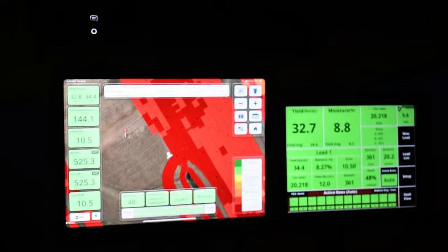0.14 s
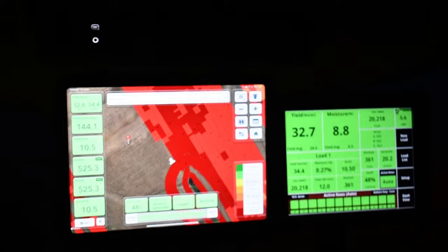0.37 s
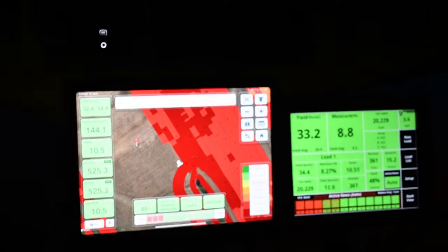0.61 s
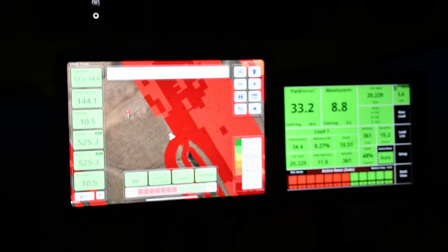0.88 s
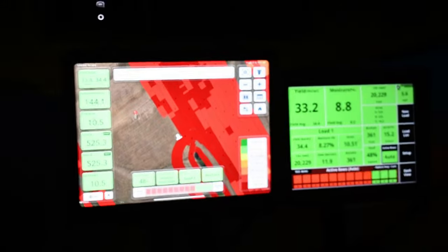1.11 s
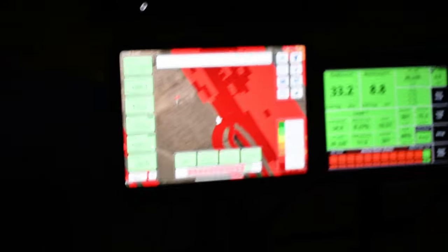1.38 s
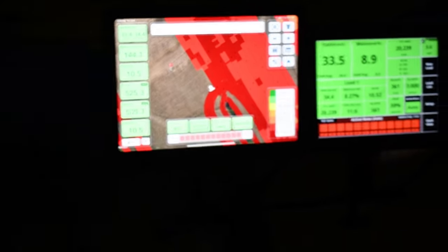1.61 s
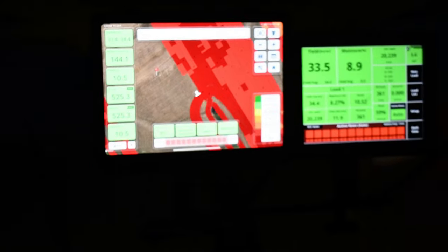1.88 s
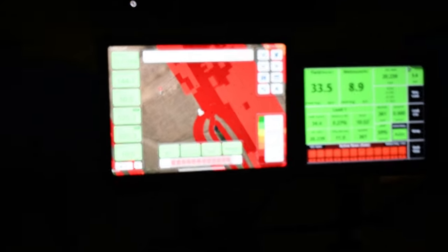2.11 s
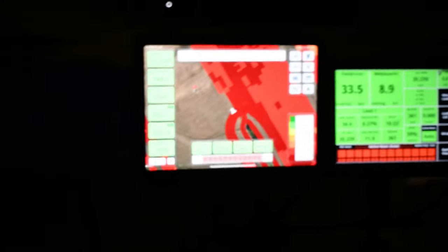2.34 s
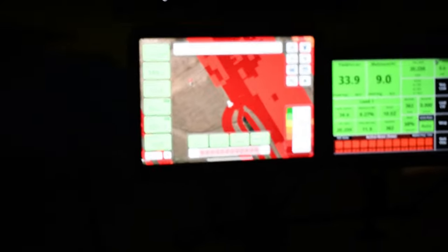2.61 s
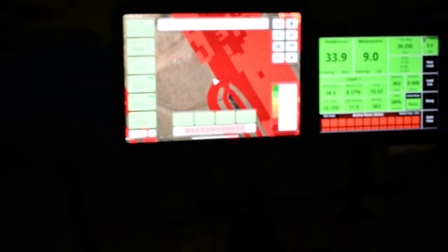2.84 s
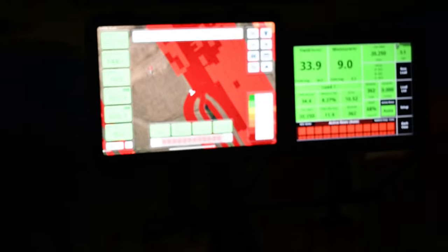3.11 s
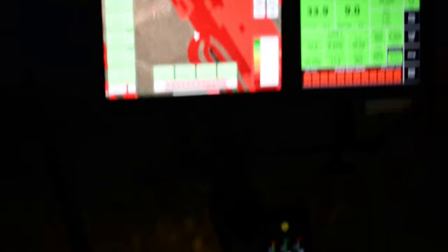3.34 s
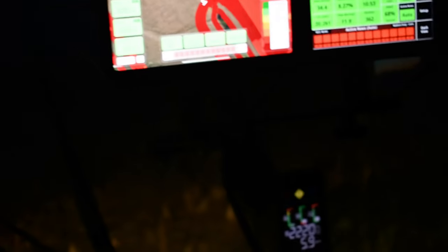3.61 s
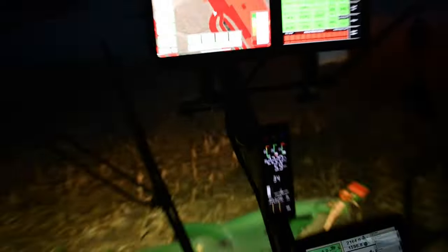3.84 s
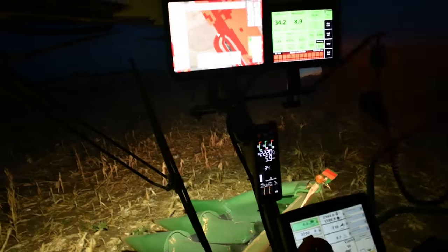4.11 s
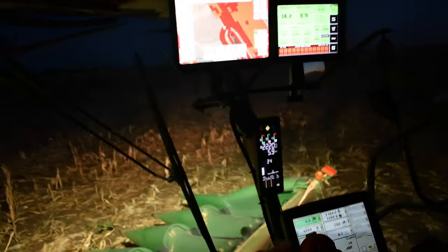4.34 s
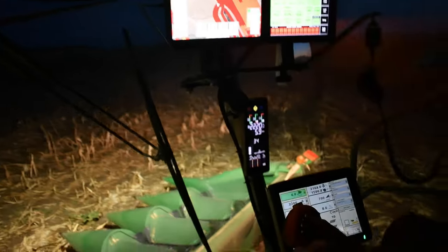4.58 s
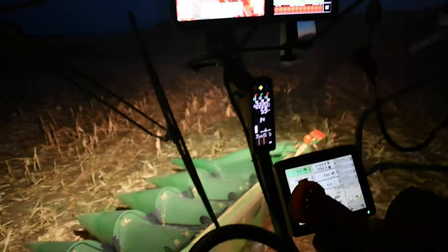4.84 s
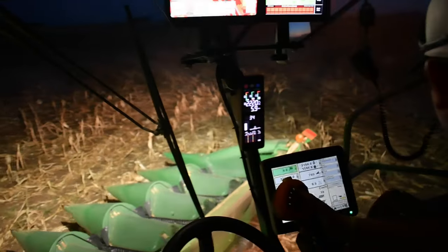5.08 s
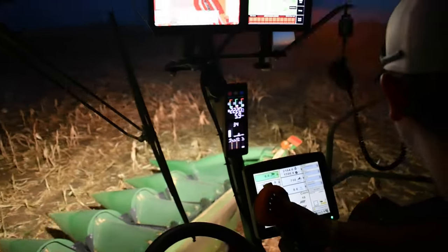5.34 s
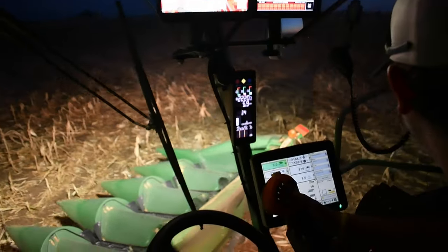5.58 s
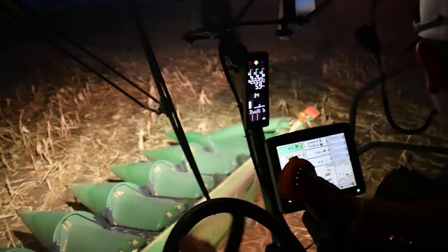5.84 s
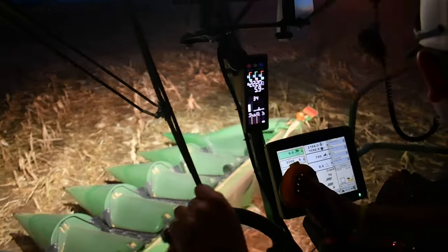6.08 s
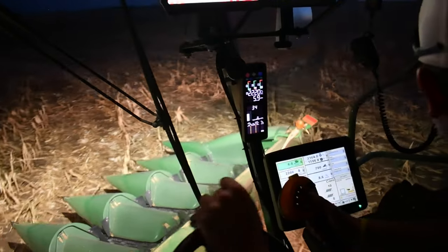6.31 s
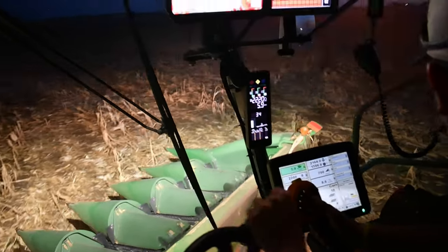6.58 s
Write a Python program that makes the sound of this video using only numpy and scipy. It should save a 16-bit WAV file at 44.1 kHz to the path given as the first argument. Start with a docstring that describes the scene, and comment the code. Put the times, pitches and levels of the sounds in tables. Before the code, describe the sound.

From 0 to about 6.7 seconds, a combine harvester runs without pause, heard by one microphone inside its closed cab. The sound begins at full strength, slightly louder for the first half second, then stays nearly level. A deep, boxy, noisy drone dominates, lurching gently several times a second as crop passes the drum. Panels boom and buzz unevenly. Low gear hums throb and drift, one around 250 hertz and another near 128. A thin pump whine near 700 hertz stays almost constant, clearer around 0.7, 2.4 and 5 seconds. Quiet, dense grain rattle, muffled crop rush and faint hiss lie above. Tiny high squeaks chirp at roughly 3.5, 3.6 and 4 seconds, almost buried. Higher gear tones come forward slightly around 6 seconds. The machine is still running steadily when the sound ends.

```python
"""Combine harvester cab

Engine, drum and header shake a closed cab, whose air and panels boom as noise shaped by many resonances.
Gears hum as sines of wandering pitch and throbbing level; a hydraulic pump whines as a sine and its octave.
Grain rattles as random impulses through a sheet's response; rushing air and hiss are coloured noise.
A dry joint squeaks in a few short whistles of arching pitch."""
import sys
import numpy as np
from scipy import signal
from scipy.fft import rfft, irfft, next_fast_len
from scipy.io import wavfile
from scipy.ndimage import uniform_filter1d, map_coordinates

SR = 44100
rng = np.random.default_rng(int(sys.argv[2]) if len(sys.argv) > 2 else 0)


def inscribe(sig):
    """Save sig as 16-bit PCM at rate SR to the path in sys.argv[1].

    A 1-D sig is mono; a 2-D sig holds one channel per row.
    Samples are clipped to [-1, 1] before scaling.
    """
    pcm = np.round(np.clip(np.atleast_2d(sig).T, -1, 1) * 32767)
    wavfile.write(sys.argv[1], SR, pcm.astype(np.int16))


def undo_db(level):
    """Turn decibels back into plain size, where 20 dB means ten times bigger."""
    steps = np.asarray(level, float) / 20
    return 10 ** steps


N = 295470  # samples

# Machine load: t/s, level/dB about the usual one
LOAD = [(0, 1.5), (.4, 0), (.9, -0.84), (2.2, -0.3), (3.2, -.5), (4, 0), (4.7, -.5), (5.3, -0.6), (6, 0),
        (6.7, -0.1)]
# Resonances of cab air and panels: f/Hz, width/Hz, relative level/dB
CAB_RESONANCES = [(97, 12, -9), (128, 16, -6.5), (164.6, 4.9, -8.5), (194, 14, -6), (220, 20, -11.5),
                  (242, 16, -7.5), (265.5, 3.2, -6), (330, 14, -14), (351, 16, -12), (398.4, 32, -17.5),
                  (418, 7.1, -14.5), (510, 11, -18), (561.5, 17, -20.5), (667, 33, -23.5), (806, 24, -22),
                  (849, 17, -25), (923, 12, -20), (1140, 31, -29.5)]
# Dull rumble that fills the gaps between the resonances: f/Hz, relative level/dB per Hz
CAB_RUMBLE = [(20, -61), (35, -43), (60, -23.5), (85, -22), (120, -9), (250, -15), (380, -21.5),
              (600, -22.5), (760, -33.5), (1100, -39), (1500, -48.5), (2500, -120)]

# Panels that the crop flow shakes now harder, now less: f/Hz, width/Hz, then rows of t/s, level/dB
ROOF = 655, 22, [(0, -63.5), (1.4, -59), (1.9, -49), (2.5, -47.5), (3.1, -53), (3.4, -54), (3.7, -51),
        (4.2, -62), (4.7, -49), (5.2, -48), (5.6, -49), (6.1, -49), (6.3, -55), (6.7, -56)]
DOOR = 531, 20, [(0, -47), (.7, -45), (1.3, -44.5), (1.8, -48.5), (3, -47.5), (4.2, -45), (5.1, -45.5),
        (5.8, -44), (6.7, -44)]
WINDSCREEN = 290, 40, [(0, -40), (.75, -38.5), (1.3, -42), (1.7, -36), (3.15, -36), (4, -39.5), (4.9, -42),
              (5.3, -39.5), (6.7, -45)]
REAR_WALL = 224, 20, [(0, -38), (.8, -37.5), (1.5, -34.5), (2.6, -40), (3.3, -39.5), (3.7, -34),
             (4.7, -33.5), (5.3, -35), (6.1, -34), (6.5, -35.5), (6.7, -36)]
FLOOR = 154, 14, [(0, -34), (.3, -28.5), (.6, -39), (1.5, -36.5), (2.5, -36), (3.7, -35.5), (4.3, -36),
         (4.7, -39), (4.95, -35), (5.3, -39.5), (5.9, -38), (6.7, -39)]
SIDE_PANE = 955, 14, [(0, -60), (1.5, -55.5), (2.5, -53), (3.4, -51), (4.5, -54), (5.5, -54.5), (6.7, -54)]

# Strongest hum of the threshing gear: t/s, f/Hz, level/dB, throb/dB
THRESHING_HUM = [(0, 252.3, -34.5, 2), (.8, 256.7, -31.5, 3.5), (.95, 254.9, -41, 3),
                 (1.45, 247.3, -34.5, 2.5), (1.75, 248, -32.5, 2.5), (2.05, 248.3, -36.5, 3),
                 (2.38, 247.3, -31, 2), (2.62, 250, -39, 3), (2.82, 257.8, -31, 1.5),
                 (3.4, 251.7, -31.5, 2.5), (3.58, 252.7, -38.5, 3.5), (3.75, 250.4, -30.5, 2),
                 (4.3, 250.6, -30, 2.5), (4.85, 251.4, -35.5, 2), (5.1, 246.5, -28, 2.5),
                 (5.6, 249.5, -33.5, 0.5), (6.2, 244.4, -31, 2.5), (6.4, 242, -39, 2.5),
                 (6.7, 245.4, -34, 5)]
# Low shaft hum: t/s, f/Hz, level/dB, throb/dB
SHAFT_HUM = [(0, 131.7, -39.5, 4), (.35, 130.9, -34, 3.5), (.7, 129.2, -32.5, 3), (1.2, 128, -33.5, 4),
             (1.452, 125.7, -42, 4), (1.8, 129, -31.5, 4.5), (2.4, 129.8, -39, 3), (3.1, 127, -37, 3),
             (3.7, 126, -34.5, 2.5), (4.3, 127.6, -39.5, 3), (5.2, 126.6, -39.5, 3.5), (5.55, 129, -42, 3),
             (6.1, 125.5, -39.5, 2), (6.5, 128.3, -39, 0), (6.7, 126.3, -29, 4.5)]
# Three higher gear hums that swell and sink: t/s, f/Hz, level/dB, throb/dB (sign ignored)
LOWER_MESH = [(0, 330, -44, 4), (.6, 328, -51, 4), (1.2, 328, -43, 3.2), (2.049, 324, -37.5, 4),
              (2.6, 328, -46.5, 4), (3.2, 328, -45, 4.4), (3.8, 328, -55.5, 2.9), (6.7, 328, -51, 3.5)]
MIDDLE_MESH = [(0, 479, -44, 2), (.5, 478, -44, 2), (1.3, 479, -45.5, 2), (1.8, 480, -43, 2.5),
               (2.1, 481, -53.5, 4), (2.6, 481, -48.5, 2), (3.4, 479, -46, 2.5), (3.9, 480, -53.5, 2),
               (4.3, 480, -47, -0.5), (4.7, 480, -53.5, 2.5), (5.3, 479, -48, 3.5), (6, 478, -53, 4),
               (6.7, 480, -43, 2)]
UPPER_MESH = [(0, 560.3, -61, 4), (3, 554.3, -56.5, 4), (3.6, 564.6, -50, 4), (4.4, 560.5, -52, 4.1),
              (5.001, 564.5, -51, 4.4), (5.6, 558.7, -50, 5.2), (6.05, 565.5, -41.5, 4.7),
              (6.35, 565, -51, 3.3), (6.7, 564, -41, 4.4)]
# Weak gear and shaft tones: f/Hz at the usual engine speed, wander/Hz, level/dB
WEAK_GEARS = [(38.4, .2, -66.5), (49.4, .4, -59.5), (103, 1.5, -51), (118.4, 0.58, -45), (159, 0.61, -43.5),
              (165.6, 0.67, -46), (192.2, 1.5, -49.5), (229, 1.5, -43), (263.3, .8, -42.5),
              (299, 0.73, -54), (493.3, 1, -53.5)]

# Pump whine, whose pitch also gives the engine speed: t/s, f/Hz, level/dB
WHINE = [(0, 699.5, -43.5), (.35, 704, -44.5), (.71, 702.5, -39), (.9, 702.6, -44.5), (1.12, 705, -42),
         (1.4, 702, -42.5), (1.68, 703.6, -46), (1.78, 702, -47), (1.95, 704, -50), (2.2, 704, -44.5),
         (2.3, 704.6, -44.5), (2.36, 704, -39), (2.48, 703, -42.5), (2.55, 707.4, -46.5),
         (2.75, 707.4, -47.5), (2.9, 709, -46), (3.2, 708, -44), (3.62, 704.2, -45.5), (3.87, 703.1, -54),
         (4.05, 699.5, -45.5), (4.25, 704, -44.5), (4.48, 704.4, -50), (4.62, 704.6, -43.5),
         (4.94, 707, -39.5), (5.3, 705.5, -39.5), (5.55, 704.6, -42.5), (5.75, 700.5, -47.5),
         (6.1, 703, -42.5), (6.3, 701.5, -47.5), (6.6, 701, -44.5), (6.7, 706, -45)]
# What the struck sheet passes through the glass: f/Hz, relative level/dB per Hz
SHEET = [(600, -120), (900, -3.5), (1300, 2.5), (2000, -3), (2600, -9), (4500, -23), (7000, -120)]
# Squeaks: start t/s, length/s, pitch crest after/s, crest f/Hz, level/dB before the fade
SQUEAKS = [(3.45, .06, 0.016, 6420, -70), (3.498, 0.036, 0.016, 6180, -73),
           (3.616, 0.026, 0.025, 5660, -67), (3.632, .03, .015, 5720, -77), (3.962, 0.069, .022, 6457, -66)]
# Crop and air heard through the glass: f/Hz, relative level/dB per Hz
RUSH = [(300, -120), (500, -30.5), (700, -9.5), (980, -7), (1420, -16.5), (1540, -20.5), (2020, -17.5),
        (2500, -24), (3050, -28), (3250, -31.5), (4000, -35), (4650, -34.5), (5100, -45.5), (7500, -120)]
# Ventilation and microphone hiss: f/Hz, relative level/dB per Hz
HISS = [(2500, -120), (4000, -34.5), (5000, 0.5), (6000, -3.5), (8000, -8.5), (9000, -9.5), (9600, -14.5),
        (12000, -18), (14500, -25), (15700, -28), (17000, -120)]

DRONE_DB, RATTLE_DB, RUSH_DB, HISS_DB = -29.5, -56.5, -43, -73  # usual levels
SURGE_DB, SURGES_PER_S = 0.8, 8  # the drone lurches as wads of crop pass the drum
HUM_THROBS_PER_S = 20
HUM_WANDER_HZ_PER_DB = 1.37  # the harder a hum throbs, the more its pitch strays
USUAL_WHINE_HZ, WHINE_FLICKER_DB = 704.5, 1.3
RATTLES_PER_S, RATTLE_SPREAD_DB = 600, 2  # grain and chaff striking sheet metal
SQUEAK_BEND_HZ_PER_S2, SQUEAK_ROUGH_HZ = 83000, 30
SQUEAK_EDGE_S, SQUEAK_FADE_DB_PER_S, SQUEAK_CHATTER_DB = 0.012, 82, 2.2
RUSH_FOLLOWS, HISS_FOLLOWS = 0.78, 0.6  # dB per dB of load
HISS_RISE_DB_PER_S = 0.39  # the hiss grows slowly


def unit(x):
    """Normalization: scales a signal to rms 1."""
    return x / np.sqrt(np.mean(x ** 2) + 1e-20)


def along(points, hz):
    """Frequency response: (Hz, dB) points joined on a log axis, as gain."""
    f, level = np.transpose(points)
    return undo_db(np.interp(np.log(hz + 1), np.log(f + 1), level))


def curves(rows):
    """Linear interpolation: one value per sample for each column after the time."""
    times, *columns = np.transpose(rows)
    return [np.interp(np.arange(N) / SR, times, column) for column in columns]


def wobble(rate):
    """Band-limited fluctuation: a smooth curve through random knots, rate of them a second."""
    knots = rng.standard_normal(int(N * rate / SR) + 4)
    return map_coordinates(knots, [np.arange(N) * rate / SR])


def patches(shape, bins, frames):
    """Local averaging: a random field of rms 1, smoothed over bins and frames."""
    across_bins = uniform_filter1d(rng.standard_normal(shape), size=bins, axis=0)
    return unit(uniform_filter1d(across_bins, size=frames, axis=1))


def noise(gain, patchy_db):
    """Linear filtering: noise with patches of random level, coloured by gain(Hz), at rms 1."""
    spectrum = signal.stft(rng.standard_normal(N), nperseg=512)[2]
    patchy = spectrum * undo_db(patchy_db * patches(spectrum.shape, bins=5, frames=12))
    x = signal.istft(patchy, nperseg=512)[1][:N]
    size = next_fast_len(N + SR)
    coloured = rfft(x, size) * gain(np.fft.rfftfreq(size, 1 / SR))
    return unit(irfft(coloured, size)[:N])


def tone(hz, db):
    """Phase is the integral of frequency: a sine of given rms level on a moving pitch."""
    cycles = np.cumsum(hz) / SR + rng.random()
    return np.sqrt(2) * undo_db(db) * np.sin(2 * np.pi * cycles)


def drone(level_db):
    """Forced resonance: random shaking feeds every cab mode; their powers add over a duller rumble."""
    def cab(hz):
        power = along(CAB_RUMBLE, hz) ** 2
        for centre, width, db in CAB_RESONANCES:
            power = power + undo_db(db) ** 2 / (1 + (2 * (hz - centre) / width) ** 2) ** 1.55
        return np.sqrt(power)
    return undo_db(level_db) * noise(cab, patchy_db=-0.44)


def panels():
    """Narrow-band noise: each panel rings as two randomly modulated carriers in quadrature."""
    turn = 2 * np.pi * np.arange(N) / SR
    out = np.zeros(N)
    for hz, width, rows in (ROOF, DOOR, WINDSCREEN, REAR_WALL, FLOOR, SIDE_PANE):
        ringing = wobble(width) * np.cos(turn * hz) + wobble(width) * np.sin(turn * hz)
        level_db, = curves(rows)
        out += undo_db(level_db) * unit(ringing)
    return out


def hum(rows):
    """Amplitude and frequency modulation: a gear tone throbs as the teeth load and unload."""
    hz, db, throb_db = curves(rows)
    throb_db = np.abs(throb_db)
    pitch = hz + HUM_WANDER_HZ_PER_DB * throb_db * wobble(10)
    throb = np.clip(wobble(HUM_THROBS_PER_S), -3, 1.2)  # dips go deeper than swells
    return tone(pitch, db + throb_db * throb)


def gears():
    """Superposition: five strong hums, and weaker tones whose pitch follows the engine speed."""
    speed = curves(WHINE)[0] / USUAL_WHINE_HZ
    out = sum(hum(rows) for rows in (THRESHING_HUM, SHAFT_HUM, LOWER_MESH, MIDDLE_MESH, UPPER_MESH))
    for hz, wander_hz, db in WEAK_GEARS:
        out += tone(hz * speed + wander_hz * wobble(6), db + 3.4 * wobble(7))
    return out


def pump():
    """Periodic pulsation: a nearly clean piston tone with a weak octave."""
    hz, db = curves(WHINE)
    whine = tone(hz + 1.6 * wobble(25), db + WHINE_FLICKER_DB * wobble(20))
    octave = tone(2 * hz + 3 * wobble(12), db - 21.5)
    return whine + octave


def rattle(level_db):
    """Impulse excitation: dense uneven ticks, whose clumps ring now duller, now brighter parts of the sheet."""
    struck = rng.random(N) < RATTLES_PER_S / SR
    ticks = struck * rng.standard_normal(N) * undo_db(RATTLE_SPREAD_DB * rng.standard_normal(N))
    hz, _, spectrum = signal.stft(ticks, SR, nperseg=512)
    clumps = undo_db(4.6 * patches(spectrum.shape, bins=3, frames=4))
    ringing = signal.istft(spectrum * along(SHEET, hz)[:, None] * clumps, nperseg=512)[1][:N]
    return undo_db(level_db) * unit(ringing)


def squeaks():
    """Stick-slip friction: fading whistles whose pitch arches as the dry joint speeds up and slows."""
    out = np.zeros(N)
    for start, length, crest, hz, db in SQUEAKS:
        t = np.clip(np.arange(N) / SR - start, 0, length)
        gate = np.clip(np.minimum(t, length - t) / SQUEAK_EDGE_S, 0, 1)
        pitch = hz - SQUEAK_BEND_HZ_PER_S2 * (t - crest) ** 2 + SQUEAK_ROUGH_HZ * wobble(200)
        level_db = db - SQUEAK_FADE_DB_PER_S * t + SQUEAK_CHATTER_DB * wobble(110)
        out += gate * tone(pitch, level_db)
    return out


def air(rush_db, hiss_db):
    """Broadband noise: crop rushes through the machine, and a hiss lies above it in frequency."""
    rush = undo_db(rush_db + 0.23 * wobble(11)) * noise(lambda hz: along(RUSH, hz), patchy_db=0.33)
    hiss = undo_db(hiss_db + 0.4 * wobble(13)) * noise(lambda hz: along(HISS, hz), patchy_db=0.5)
    return rush + hiss


def scene():
    """Superposition at one microphone in the cab; the load drives the drone, rattle and air."""
    load_db, = curves(LOAD)
    drone_db = DRONE_DB + load_db + SURGE_DB * wobble(SURGES_PER_S)
    rush_db = RUSH_DB + RUSH_FOLLOWS * load_db
    hiss_db = HISS_DB + HISS_FOLLOWS * load_db + HISS_RISE_DB_PER_S * np.arange(N) / SR
    body = drone(drone_db) + panels()
    machinery = gears() + pump() + rattle(RATTLE_DB + load_db) + squeaks()
    return (body + machinery + air(rush_db, hiss_db))[None]


def band_limit(x):
    """A steep low-pass at the top of the band."""
    return signal.sosfilt(signal.butter(12, 15720, fs=SR, output="sos"), x)


def record(dry):
    """Direct pickup: the sound at the microphone is the finished mix."""
    return band_limit(dry)


dry = scene()
out = record(dry)
inscribe(out)
```